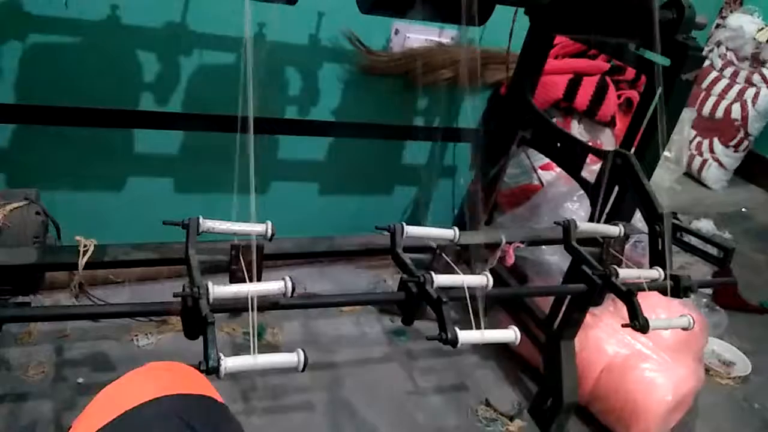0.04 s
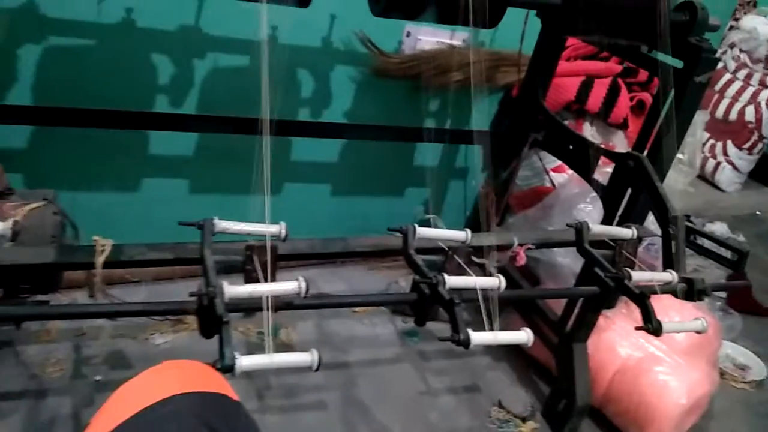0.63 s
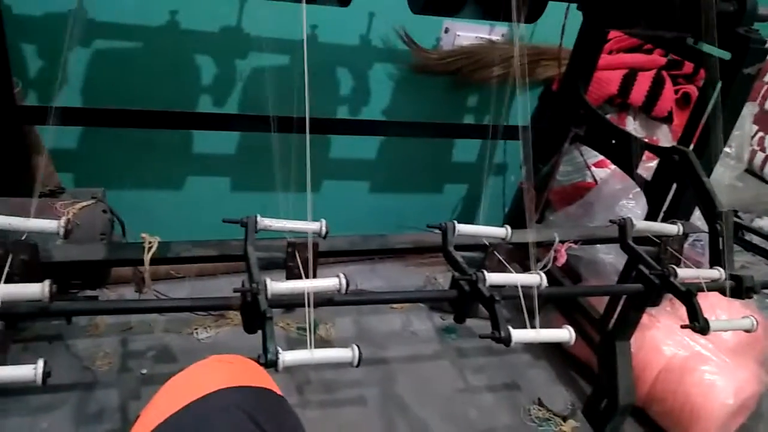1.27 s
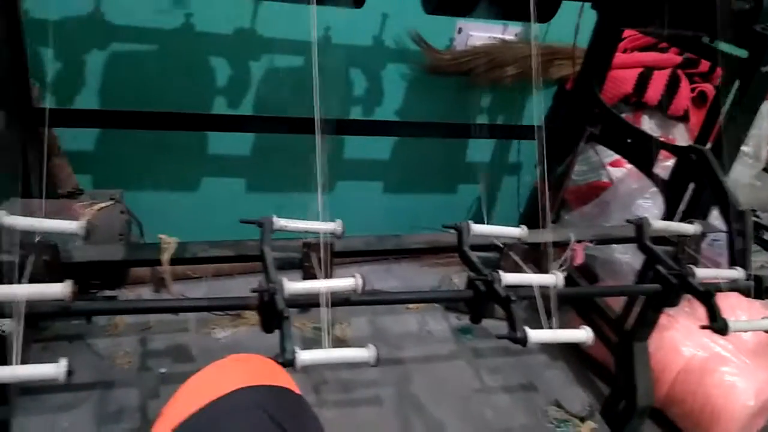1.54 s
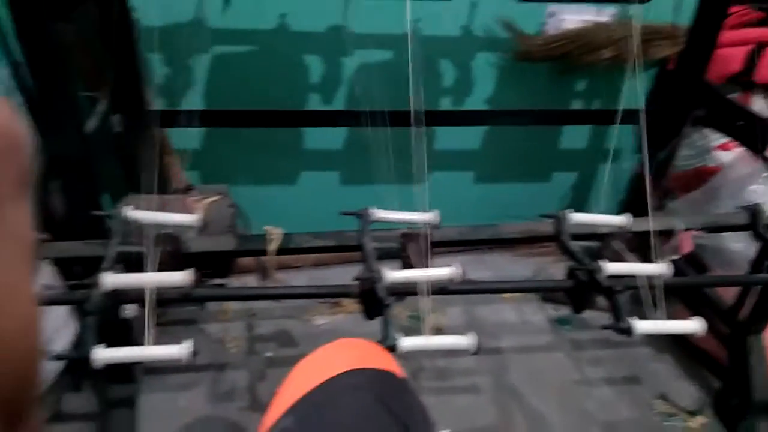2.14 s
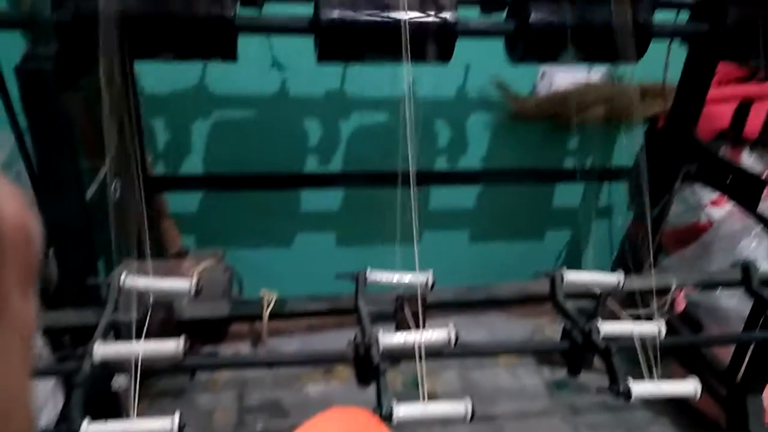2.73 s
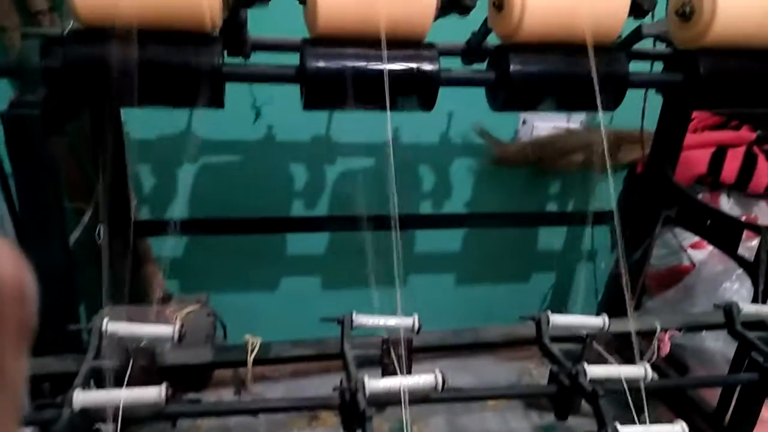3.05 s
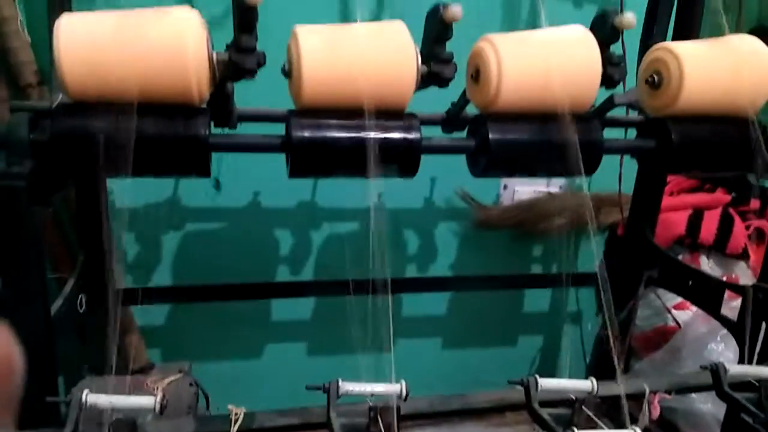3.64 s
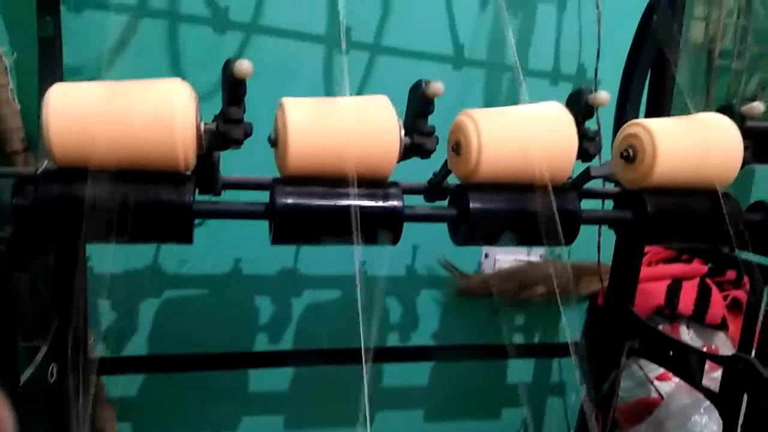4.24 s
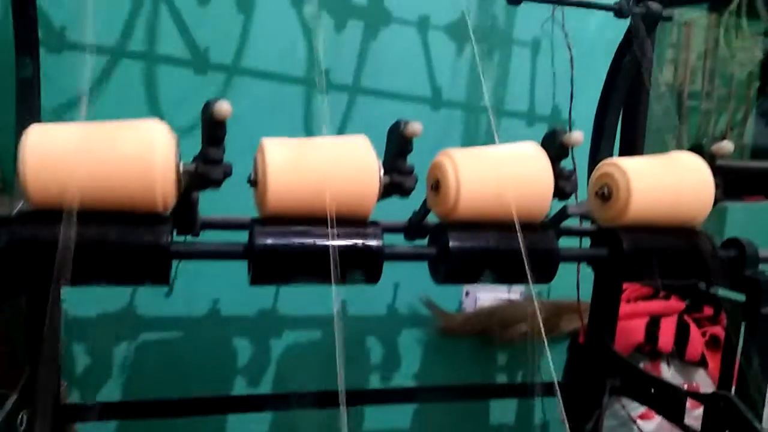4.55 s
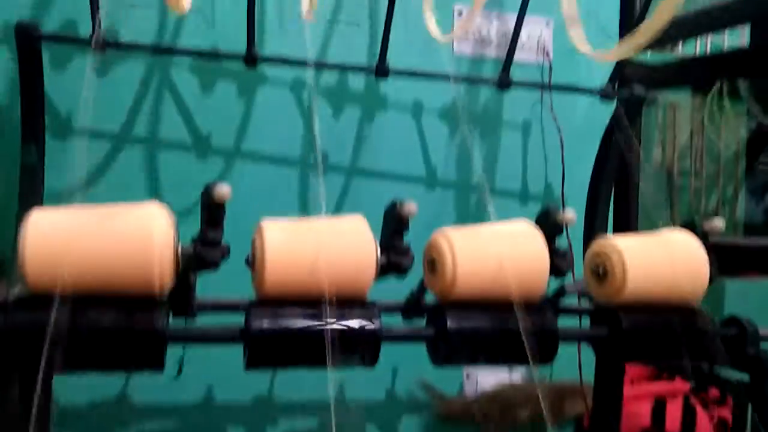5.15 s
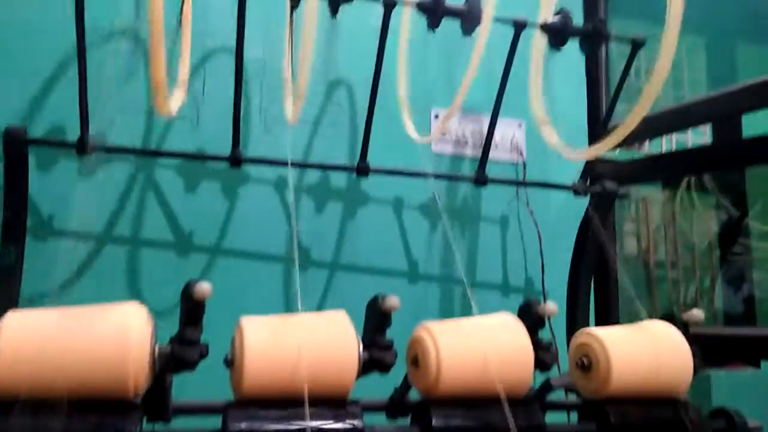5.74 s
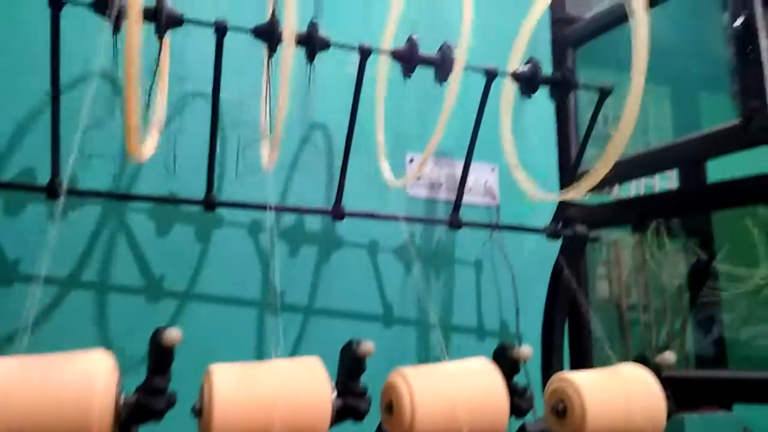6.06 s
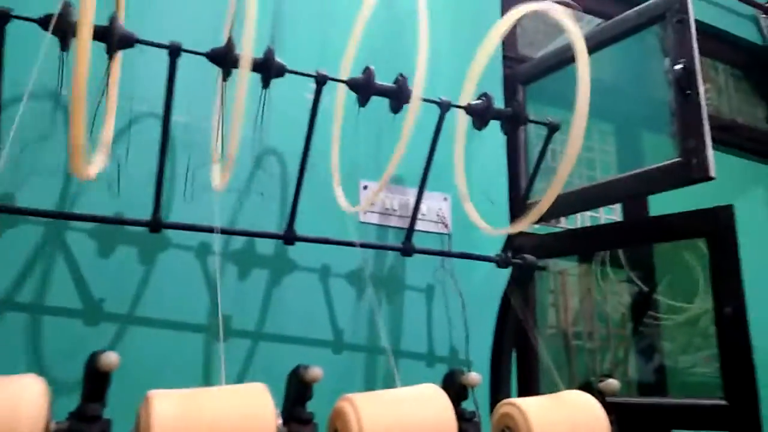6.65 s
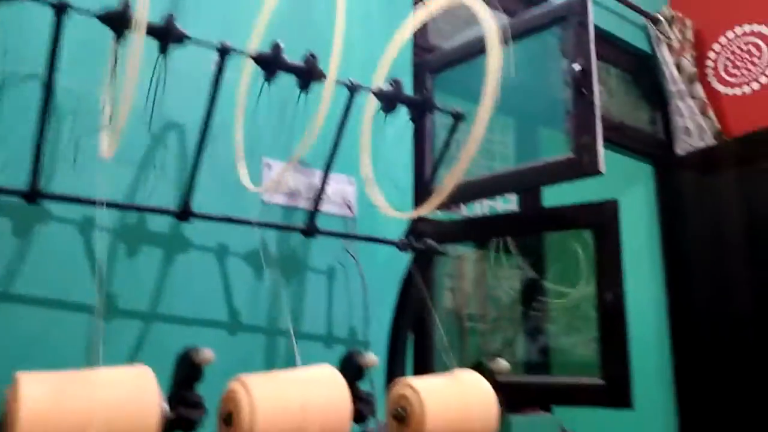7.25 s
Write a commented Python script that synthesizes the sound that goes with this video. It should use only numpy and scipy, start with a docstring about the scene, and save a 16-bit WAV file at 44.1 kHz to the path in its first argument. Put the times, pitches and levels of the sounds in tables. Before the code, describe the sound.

It is silent until about 0.8 seconds, when a yarn winding machine cuts in, already running, heard close in a small room. Fingers bump the hand-held microphone in a quick cluster of thumps and pops from 0.9 to 1.1 seconds, the loudest moment; softer touches follow near 2.3 and 4.1. Throughout, the frame and drums rattle with a fast throb, over droning cones and a low motor rumble. The cones hum briefly now and then. Running yarn gives a thin, wavering hiss and ticks sharply as it snatches free, most clearly around 1.7, 2.6, 4.2, 5.9 and 7.2 seconds. Loose reel arms clink lightly at 1.2 and 1.5 seconds, then often from 4.5 onward. Faint high squeaks come near 2.5 and 7.2 seconds. The yarn's dry rubbing grows a little after 5 seconds, and the rumble swells from 7 until the end at about 7.5.

```python
"""Yarn winding machine

In a small room, heard from the operator's seat, a drum shaft rattles and its cones drone, both
throbbing once a turn over the motor's rumble. Friction makes the yarn hiss and squeak, and it ticks
as it snatches free. Fingers bump the hand-held microphone just after it is switched on, loose reel
arms clink, and now and then a cone rides up and hums."""
import sys
import numpy as np
from scipy import signal
from scipy.fft import rfft, irfft
from scipy.io import wavfile
from scipy.ndimage import uniform_filter1d

SR = 44100
rng = np.random.default_rng(int(sys.argv[2]) if len(sys.argv) > 2 else 0)


def bounce(signal):
    """Save signal as a 16-bit WAV file at the path given by the first command-line argument."""
    frames = np.transpose(np.atleast_2d(signal))
    limited = np.clip(frames, -1, 1)
    pcm = np.round(limited * 32767).astype(np.int16)
    wavfile.write(sys.argv[1], SR, pcm)


N = 330750
TIME = np.arange(N) / SR
BINS = np.fft.rfftfreq(N, 1 / SR)

# loose play in the drive: (time [s], relative frame level [dB], relative drum level [dB])
BEARING_PLAY = [(0.8, -50.5, -44.5), (1.0, -48, -46.5), (1.1, -42, -40), (1.4, -49.5, -43),
                (1.65, -51, -46.5), (2.35, -49.5, -43.5), (3.0, -49, -43), (3.55, -51.5, -45.5),
                (4.1, -50, -46), (4.4, -52, -45), (5.4, -50, -47.5), (5.9, -51, -50), (6.4, -51, -45.5),
                (7.05, -46.5, -44.5), (7.5, -51, -46)]
# spectrum of the frame's clatter: (frequency [Hz], relative level [dB])
FRAME_SPECTRUM = [(380, -6.5), (450, -3), (600, 4.5), (665, -2.5), (900, 0.5), (1150, 5.5), (1370, 5),
                  (1550, 3.5), (1700, 6.5), (1900, 0), (2400, -5), (2900, -11.5), (3500, -22),
                  (6000, -21.5)]
# resonances of the frame: (frequency [Hz], nominal width [Hz], relative level [dB])
FRAME_MODES = [(877.6, 12.6, -15.5), (1380.6, 13.4, -8), (2973, 22, -37), (3148, 11, -24)]
# resonances of the hollow drums: (frequency [Hz], nominal width [Hz], relative level [dB])
DRUM_MODES = [(1898, 9, -6), (2065, 27, -2.5), (2203, 39, -1), (2333, 28, -2)]
# band in which the moving microphone hears the drums: (time [s], centre frequency [Hz])
DRUM_BAND = [(0.8, 2110), (1.04, 2140), (1.53, 2060), (2.46, 2304), (2.78, 2200), (4.64, 2097),
             (5.11, 2165), (6.56, 2120), (7.22, 1936)]
# resonances of the cones: (frequency [Hz], nominal width [Hz], relative level [dB])
CONE_MODES = [(449, 14, -5.5), (469.7, 32.6, 4)]

# course of the motor's rumble: (time [s], relative level [dB])
RUMBLE_LEVEL = [(1.2, -59), (1.65, -63.5), (2.1, -60.5), (3.8, -62), (4.7, -60.5), (5.45, -57.5),
                (6.0, -64), (6.6, -59.5), (6.99, -60.5), (7.05, -52), (7.5, -49.5)]
# spectrum of the rumble: (frequency [Hz], relative level [dB])
RUMBLE_SPECTRUM = [(25, -76), (55, -35), (90, -4), (130, 2), (165, -8.5), (220, -12), (320, -0.5),
                   (372, -30.5), (430, 0), (700, -48)]
# motor hum: (frequency [Hz], relative level [dB])
HUM_TONES = [(100, -5), (124, -11), (158, -7.5), (323, -12.5)]
# bearing whine: (frequency [Hz], level [dB])
WHINE_TONES = [(3805, -86), (4195, -85), (4618, -80), (4846, -80), (5078, -80), (6673, -79), (8243, -70)]

# steady pull on the yarn, expressed as its hiss: (time [s], relative level [dB])
YARN_PULL = [(0.8, -49), (1.0, -51), (1.28, -44), (1.42, -53.5), (2.4, -49.5), (2.9, -50.5), (3.15, -54.5),
             (3.6, -53.5), (3.95, -48.5), (4.1, -52.5), (4.6, -51), (4.87, -52), (5.0, -46.5),
             (5.25, -53.5), (5.88, -58), (6.2, -56), (6.4, -51), (7.35, -51.5)]
# yarn dragging on a drum: (centre time [s], half length [s], pull change [dB], rattle rise [dB])
DRAGS = [(1.745, .03, 3, 3.5), (1.925, 0.031, 3.5, 4.5), (2.247, 0.026, 4, 2), (2.533, .045, 7.5, 7.5),
         (3.321, 0.042, 5.5, 9.5), (4.32, 0.033, 1.5, 5), (4.55, 0.024, 4.5, 4.5), (4.774, 0.027, 3.5, 7),
         (5.052, 0.041, 3.5, 7.5), (5.425, 0.034, -2, 8), (5.65, 0.059, 9, 3), (6.097, 0.037, 7, 5),
         (6.31, 0.02, 1.5, 3.5), (6.43, 0.028, 4.5, 1), (7.238, .025, 3.5, 3), (7.488, 0.022, 5.5, 5)]
# spectrum of the yarn's hiss: (frequency [Hz], relative level [dB])
HISS_SPECTRUM = [(3000, -27), (5700, -41), (6600, -9), (7400, 1), (8500, 3.5), (10000, 0), (10900, -3.5),
                 (11600, -8.5), (14300, -13.5)]
# top of the hiss, which grows with pull: (frequency [Hz], gain [dB])
TAUT_TREBLE = [(9000, -30), (12000, -9)]
# stereo width of the friction noise: (frequency [Hz], side relative to mid [dB])
STEREO_SIDE = [(4000, -49), (5500, -25.5), (7000, -8), (14000, -4.5)]
# spectrum of dry rubbing in the guides: (frequency [Hz], relative level [dB])
RUB_SPECTRUM = [(2300, 4.5), (3100, 1), (3600, -4.5), (4300, -4.5), (5400, -0.5), (6300, 3.5), (7000, 4),
                (9000, -19.5)]
# the guides are heard better as the microphone tilts up: (time [s], relative level [dB])
GUIDE_NEARNESS = [(0.8, -19), (3.5, -19.5), (5.1, -15.5), (5.8, -12), (7.5, -12.5)]
# resonances of the guide wire: (frequency [Hz], nominal width [Hz], relative level [dB])
WIRE_MODES = [(3170, 280, -5.5), (4755, 210, 5.5)]

# fingers on the microphone port, in relative levels: (time [s], push [dB], pop [dB], housing ring [dB])
FINGER_TOUCHES = [(0.88, -32, -28, -38), (0.8897, -24, -26, -36), (.9100, -13.5, -16, -28),
                  (0.9967, -16.5, -20, -16), (1.021, -17, -21, -17.5), (1.053, -6.5, -4.5, -12.5),
                  (2.235, -36, -57, -53), (2.266, -39, -57, -57), (2.302, -43, -57, -55),
                  (4.136, -29, -26, -54)]
# yarn snatching free: (time [s], relative tick level [dB], jump in pull [dB])
SNATCHES = [(1.108, -28.5, -5.5), (1.459, -33, 4.5), (1.506, -30.5, 6), (1.718, -18.5, 8.5), (1.89, -39, 6),
            (2.6234, -23.5, 2), (3.213, -40, 9.5), (3.2281, -31, 4.5), (4.1841, -21.5, 7.5),
            (4.707, -30, 3), (4.785, -29, 1.5), (5.3266, -28.5, 5.5), (5.9496, -24, 16), (6.235, -46, 3.5),
            (6.5382, -25, 3), (6.554, -30, 1.5), (6.935, -30, 7), (7.1665, -23, 5.5), (7.411, -41, 9)]
# spectrum of a snatch: (frequency [Hz], relative level [dB])
SNATCH_SPECTRUM = [(3000, -35), (6500, -5), (7600, 6.5), (10000, 9), (12000, 0), (14300, -13)]
# loose reel arms striking their stops: (time [s], relative level [dB], frequency [Hz])
REEL_CLINKS = [(1.2356, -25.5, 1770), (1.46, -23, 1695), (3.3288, -44, 2290), (4.4954, -27, 1730),
               (4.5605, -25.5, 1870), (4.6399, -30, 2240), (4.7205, -24, 1680), (4.947, -26.5, 1720),
               (5.009, -28.5, 1730), (5.5378, -30.5, 2040), (5.6175, -28.5, 1880), (6.2395, -23.5, 1702),
               (6.626, -30.5, 1540), (6.8502, -29, 1910), (6.9571, -29, 1380), (7.334, -25.5, 1896)]
# a cone riding up on its drum: (centre time [s], half length [s], relative level [dB])
CONE_RIDES = [(1.244, 0.018, -35), (1.626, 0.0098, -42.5), (1.963, 0.014, -37.5), (2.591, 0.026, -45),
              (3.428, 0.013, -36.5), (3.647, 0.026, -44.5), (3.715, 0.012, -37), (3.775, 0.012, -41),
              (3.934, 0.023, -43.5), (4.118, 0.053, -39), (4.343, 0.028, -42), (4.557, 0.016, -45),
              (4.838, 0.015, -45), (5, 0.026, -41.5), (5.394, 0.013, -42), (5.457, 0.018, -36.5),
              (5.634, 0.054, -43.5), (5.905, 0.032, -41), (6.003, .025, -41), (6.236, 0.023, -40),
              (7.092, 0.054, -41), (7.217, 0.027, -40)]
# yarn squeaking in a guide: (start time [s], length [s], level [dB], frequency [Hz])
SQUEAKS = [(1.73, .06, -55, 4660), (2.442, 0.028, -51.5, 4970), (2.467, 0.1, -48, 4780),
           (6.927, 0.045, -53, 4940), (7.223, 0.059, -47.5, 4500), (7.42, .06, -57, 4800)]


def from_db(db):
    """Amplitude grows tenfold every 20 dB."""
    return 10 ** (np.asarray(db) / 20)


def unit_rms(x):
    """Normalisation to unit mean power."""
    return x / np.sqrt(np.mean(x ** 2) + 1e-20)


def in_time(rows):
    """Linear interpolation of each column at every sample."""
    times, *columns = np.transpose(rows)
    return [np.interp(TIME, times, column) for column in columns]


def colour(x, spectrum):
    """Spectral shaping by a gain curve on a log-frequency axis."""
    hz, db = np.transpose(spectrum)
    return irfft(rfft(x) * from_db(np.interp(np.log(BINS + 1), np.log(hz), db)), N)


def drift(rate_hz):
    """Low-passed noise: a slow random fluctuation of unit power."""
    return unit_rms(irfft(rfft(rng.standard_normal(N)) / (1 + (BINS / rate_hz) ** 2), N))


def resonate(x, hz, width_hz):
    """A damped oscillator: two-pole resonance with unit peak gain."""
    radius = np.exp(-np.pi * width_hz / SR)
    feedback = [1, -2 * radius * np.cos(2 * np.pi * hz / SR), radius ** 2]
    return signal.lfilter(np.array([1, 0, -1]) * (1 - radius ** 2) / 2, feedback, x + 1e-18)


def body(x, modes):
    """Modal superposition: steep-sided resonances add, each at its own level."""
    return sum(from_db(db) * unit_rms(resonate(resonate(x, hz, 2 * width), hz, 2 * width))
               for hz, width, db in modes)


def steady(x, span_s):
    """Division by the running RMS evens out swells and keeps the fine grain."""
    return x / np.sqrt(uniform_filter1d(x * x, int(span_s * SR)) + 1e-12)


def contacts(per_s, spread_db):
    """A Poisson process of tiny, uneven impacts."""
    sizes = from_db(spread_db * np.minimum(rng.exponential(1, N), 4)) * rng.choice([-1, 1], N)
    return sizes * (rng.random(N) < per_s / SR)


def burst(start_s, rise_s, t60_s):
    """A quick rise, then the exponential decay of a damped vibration."""
    age = np.clip(TIME - start_s, 0, 3 * t60_s)
    return (1 - np.exp(-age / rise_s)) * from_db(-60 * age / t60_s)


def swell(centre_s, half_s):
    """A Gaussian rise and fall."""
    return np.exp(-((TIME - centre_s) / half_s) ** 2)


def cycle(hz, peak_s):
    """Simple harmonic motion with a crest at peak_s."""
    return np.cos(2 * np.pi * hz * (TIME - peak_s))


def tones(partials, waver_hz, waver_db):
    """Random amplitude and frequency modulation makes pure tones waver."""
    out = np.zeros(N)
    for hz, db in partials:
        amplitude = np.sqrt(2) * from_db(db + waver_db * drift(rate_hz=24))
        pitch_hz = hz + waver_hz * drift(rate_hz=18.8)
        out += amplitude * np.sin(2 * np.pi * np.cumsum(pitch_hz) / SR)
    return out


def shaft_throb(depth, shaft_hz=17.8):
    """Amplitude modulation: the slightly bent shaft presses harder once a turn."""
    angle = 2 * np.pi * shaft_hz * TIME - 0.5
    return unit_rms(np.exp(depth * (np.cos(angle) + 0.38 * np.cos(2 * angle))))


def frame_clatter(clacks_per_s=160, parts=18):
    """Impact excitation: the frame rings, and each small loose part clacks at its own pitch."""
    clatter = steady(colour(contacts(per_s=2000, spread_db=2.5), FRAME_SPECTRUM), span_s=0.11)
    clacks = sum(hz * resonate(contacts(clacks_per_s / parts, spread_db=3.5), hz, width_hz=32)
                 for hz in np.geomspace(800, 1900, parts))
    ring = body(contacts(per_s=900, spread_db=2.5), FRAME_MODES)
    return clatter + from_db(-1) * unit_rms(clacks) + ring


def drum_rattle(half_width_hz=210):
    """Directivity: the hollow drums are heard in a band that shifts with the listening angle."""
    impacts = unit_rms(contacts(per_s=1200, spread_db=-2.5))
    ring = from_db(-22) * body(contacts(per_s=1500, spread_db=3), DRUM_MODES)
    centre_hz, = in_time(DRUM_BAND)
    # shifting down, low-passing and shifting back makes a moving band-pass
    carrier = np.exp(2j * np.pi * np.cumsum(centre_hz) / SR)
    low_pass = signal.butter(2, half_width_hz, fs=SR, output="sos")
    band = signal.sosfilt(low_pass, (impacts + ring) / carrier) * carrier
    return steady(band.real, span_s=0.049)


def drive():
    """Structure-borne sound: loose bearings chatter into the frame and the drums."""
    frame_db, drum_db = in_time(BEARING_PLAY)
    chatter_db = 0.9 * drift(rate_hz=10)
    drag_db = sum(db * swell(s, half_s) for s, half_s, _, db in DRAGS)
    frame = from_db(frame_db + chatter_db + 0.5) * frame_clatter()
    drums = from_db(drum_db + chatter_db + drag_db + 0.6) * drum_rattle()
    return (frame + drums) * shaft_throb(depth=0.11)


def cone_drone():
    """Resonance and beating: cones of unequal size drone on the drums."""
    beat_db = cycle(hz=4.48, peak_s=0.11)
    wander_db = 3.5 * drift(rate_hz=2.3)
    drone = steady(body(rng.standard_normal(N), CONE_MODES), span_s=0.146)
    return from_db(-53.5 + beat_db + wander_db) * drone * shaft_throb(depth=0.13)


def motor():
    """Line spectra over a continuous one: hum follows the rumble, and the bearings whine thinly."""
    rumble_db, = in_time(RUMBLE_LEVEL)
    rumble = from_db(rumble_db + 1) * steady(colour(rng.standard_normal(N), RUMBLE_SPECTRUM), span_s=0.32)
    hum_db = -60.5 + rumble_db - np.median(rumble_db)
    hum = from_db(hum_db) * tones(HUM_TONES, waver_hz=4.1, waver_db=3)
    return rumble + hum + tones(WHINE_TONES, waver_hz=6.8, waver_db=2.5)


def yarn_tension(slack_share=0.2, slack_s=0.047, relax_s=0.079):
    """Tension, in dB, swings with the reel arms, shifts in a drag, and jumps and relaxes at a snatch."""
    pull_db, = in_time(YARN_PULL)
    pull_db += 0.5 * cycle(hz=3.3, peak_s=0.24)
    pull_db += sum(db * swell(s, half_s) for s, half_s, db, _ in DRAGS)
    for s, _, jump_db in SNATCHES:
        away_s = np.abs(TIME - s)
        slack = -slack_share * np.exp(-away_s / slack_s)   # a caught strand slackens before it frees
        pull_db += jump_db * np.where(TIME < s, slack, np.exp(-away_s / relax_s))
    return uniform_filter1d(pull_db, size=180)


def friction_noise(spectrum, flicker_db, band_hz=330, groups=9):
    """Friction makes broadband noise: interleaved bands flicker, and the treble differs by side."""
    mid, side = (unit_rms(colour(white, spectrum)) for white in rng.standard_normal((2, N)))
    stereo = rfft(mid + colour(side, STEREO_SIDE) * [[1], [-1]])
    group = (BINS / band_hz).astype(int) % groups
    out = sum(irfft(stereo * (group == k), N) * from_db(flicker_db * drift(rate_hz=31))
              for k in range(groups))
    return out / np.std(out.mean(axis=0))


def running_yarn():
    """Sliding friction grows with tension: yarn hisses on the drums, rubs the guides, rings their wire."""
    pull_db = yarn_tension()
    usual_db = np.median(pull_db)
    excess_db = pull_db - usual_db
    nearness_db, = in_time(GUIDE_NEARNESS)
    rub_db = usual_db + 1.12 * excess_db + nearness_db + 8
    wire_db = -77.5 + 1.1 * excess_db + 3.6 * drift(rate_hz=7.1)
    flutter_db = 1.7 * drift(rate_hz=30)
    hiss = from_db(pull_db + flutter_db - 0.5) * friction_noise(HISS_SPECTRUM, flicker_db=3)
    hiss += colour(hiss, TAUT_TREBLE) * (from_db(0.27 * excess_db) - 1)   # a taut strand is brighter
    rub = from_db(rub_db + flutter_db) * friction_noise(RUB_SPECTRUM, flicker_db=5)
    wire = from_db(wire_db) * body(rng.standard_normal(N), WIRE_MODES)
    return hiss + rub + wire


def finger_bumps(push_s=0.00056, pop_s=0.00027, lag_s=0.0064, low_cut_hz=48, suction=0.12):
    """Pressure transients: a fingertip pushes air into the port, sucks, and pops as the seal breaks."""
    pressure, housing, crack = np.zeros((3, N))
    hardest_db = max(row[1] for row in FINGER_TOUCHES)
    for s, push_db, pop_db, ring_db in FINGER_TOUCHES:
        age = TIME - s
        # a lighter touch lets go more slowly
        release = (age - lag_s) / (pop_s * from_db(0.11 * (hardest_db - push_db)))
        push = np.exp(-np.minimum((age / push_s) ** 2, 50) / 2)
        sealed = (np.tanh((age - 2 * push_s) / push_s) - np.tanh(release)) / 2
        pressure += from_db(push_db) * (push - suction * sealed)
        pressure += from_db(pop_db) * 2 * release / (1 + release ** 2) ** 2
        # the pop sets the housing ringing and creaking
        ring = np.sin(2 * np.pi * 900 * (age - lag_s))
        housing += from_db(ring_db) * burst(s + lag_s - 2 * pop_s, rise_s=0.0001, t60_s=0.011) * ring
        crack += from_db(ring_db) * burst(s + lag_s, rise_s=0.0001, t60_s=0.025)
    # the low cut swings back after each pulse
    swing = signal.sosfilt(signal.cheby1(2, 3, low_cut_hz, "high", fs=SR, output="sos"), pressure)
    thud = from_db(7) * resonate(swing, hz=53, width_hz=22)
    creak = from_db(-17.5) * crack * rng.standard_normal(N)
    snap = from_db(10.5) * resonate(pressure, hz=4300, width_hz=950)
    return from_db(3.5) * swing + thud + housing + creak + snap


def yarn_snatches():
    """Sudden release: caught yarn frees with a tick, and wall reflections add a short wash."""
    envelope = np.zeros(N)
    for s, db, _ in SNATCHES:
        tick = burst(s, rise_s=0.0003, t60_s=0.042)
        wash = from_db(-11.5) * burst(s, rise_s=0.008, t60_s=0.33)
        envelope += from_db(db - 10) * (tick + wash)
    return envelope * friction_noise(SNATCH_SPECTRUM, flicker_db=2)


def reel_clinks():
    """Damped free vibration: a reel arm strikes its stop, giving a dry tap with a faint tail."""
    out = np.zeros(N)
    white = rng.standard_normal(N)
    for s, db, hz in REEL_CLINKS:
        tap = burst(s, rise_s=0.0016, t60_s=0.036) * np.sin(2 * np.pi * hz * (TIME - s))
        tail = burst(s, rise_s=0.004, t60_s=0.13) * unit_rms(resonate(white, hz, width_hz=150))
        out += from_db(db - 2.5) * tap / tap.max() + from_db(db - 15.5) * tail
    return out


def riding_cones(centre_hz=467.7, scatter=0.04):
    """Forced vibration: a cone rides up on its drum and hums briefly at an unsteady pitch."""
    pitch_hz = centre_hz * (1 + scatter * drift(rate_hz=30))
    envelope = sum(from_db(db) * swell(s, half_s) for s, half_s, db in CONE_RIDES)
    return envelope * shaft_throb(depth=0.18) * np.sin(2 * np.pi * np.cumsum(pitch_hz) / SR)


def guide_squeaks(width_hz=350):
    """Frictional excitation: yarn squeaks in a guide as a short swell of narrow-band noise."""
    white = rng.standard_normal(N)
    return sum(np.sin(np.pi * np.clip((TIME - s) / length_s, 0, 1)) * body(white, [(hz, width_hz, db)])
               for s, length_s, db, hz in SQUEAKS)


def scene():
    """Superposition of the sources; a standing-wave null at the seat notches the machine's sound."""
    machine = drive() + cone_drone() + riding_cones() + reel_clinks() + motor()
    at_seat = machine - resonate(machine, hz=378, width_hz=22)
    yarn = running_yarn() + yarn_snatches() + guide_squeaks()
    return at_seat + yarn + finger_bumps()


def record(dry, mic_on_s=0.785, cutoff_hz=14250):
    """Gating and band limiting: silence until the microphone is on, and a steep treble cut."""
    live = np.clip((TIME - mic_on_s) / 0.003, 0, 1)
    return signal.sosfilt(signal.ellip(10, 0.3, 70, cutoff_hz, fs=SR, output="sos"), dry * live)


dry = scene()
out = record(dry)
bounce(out)
```